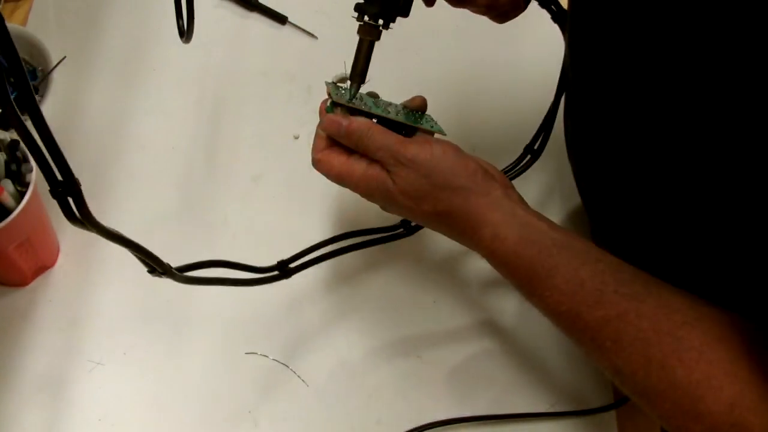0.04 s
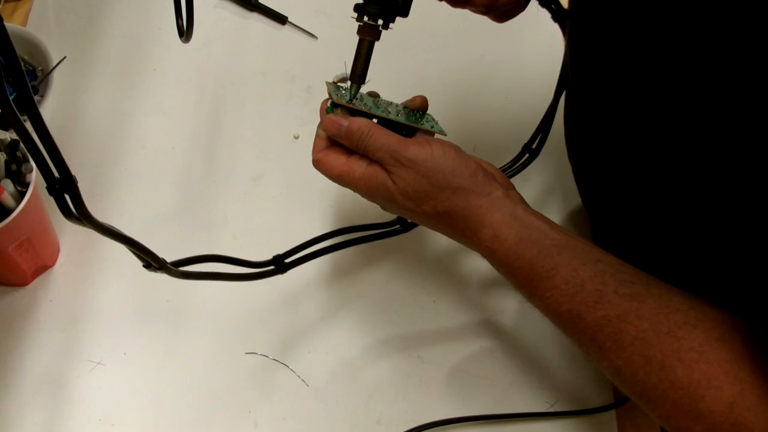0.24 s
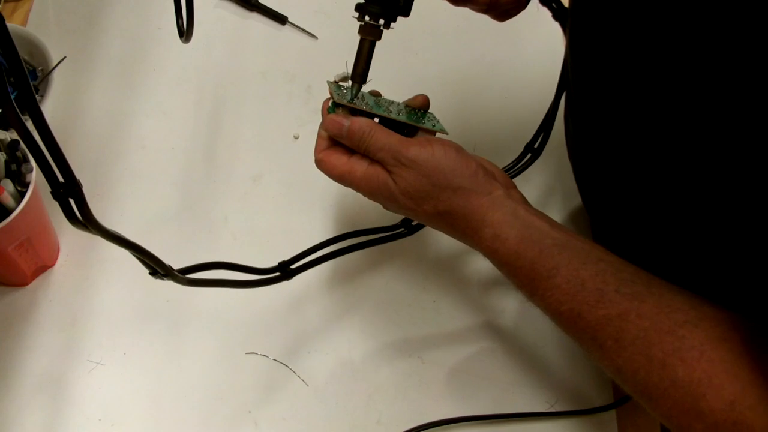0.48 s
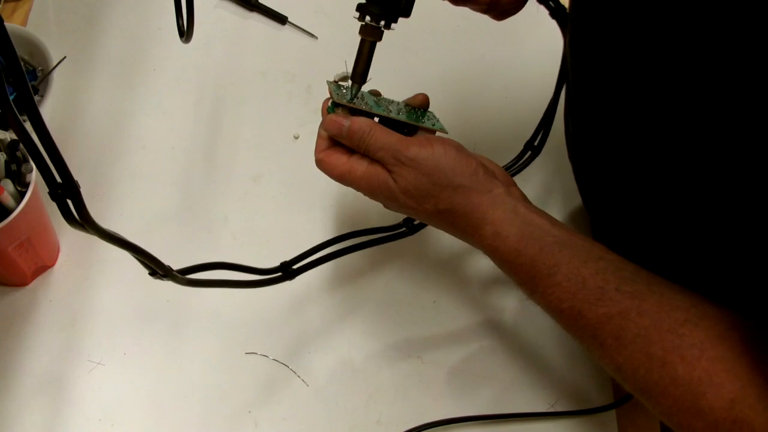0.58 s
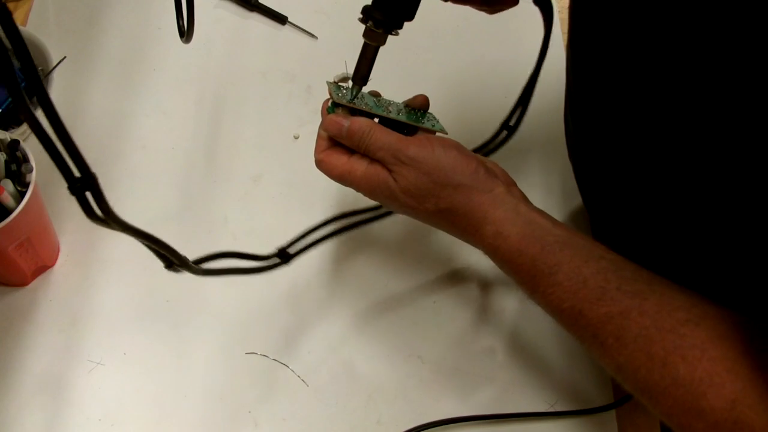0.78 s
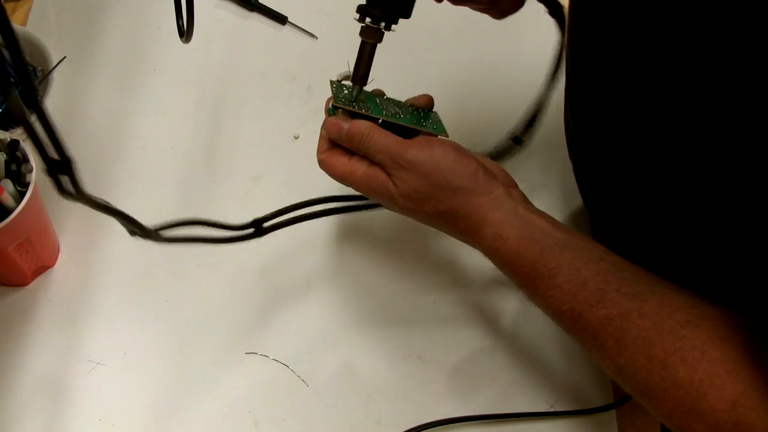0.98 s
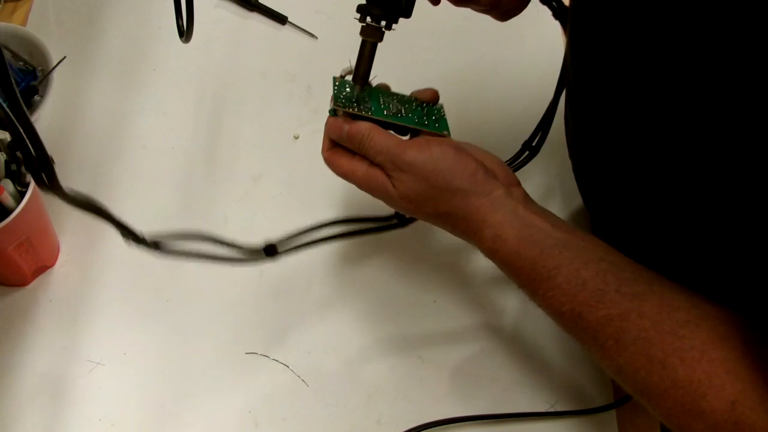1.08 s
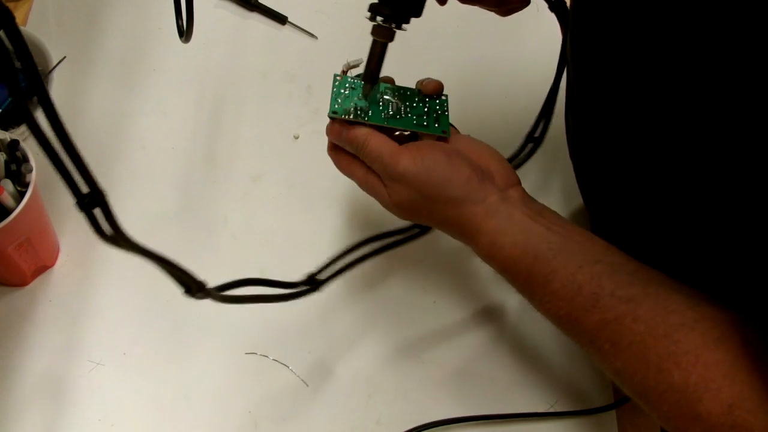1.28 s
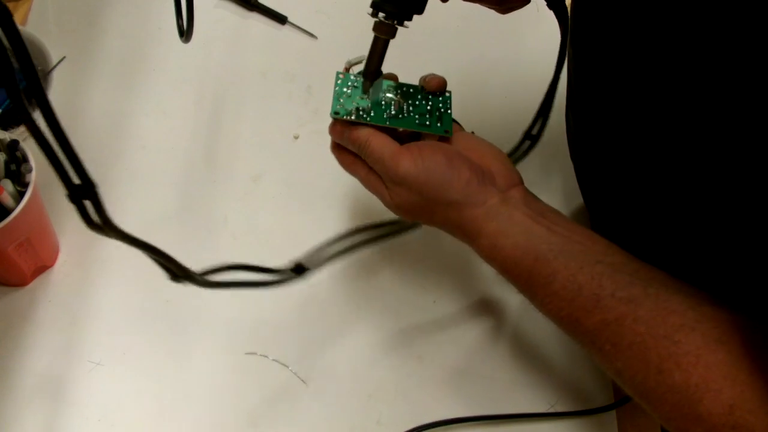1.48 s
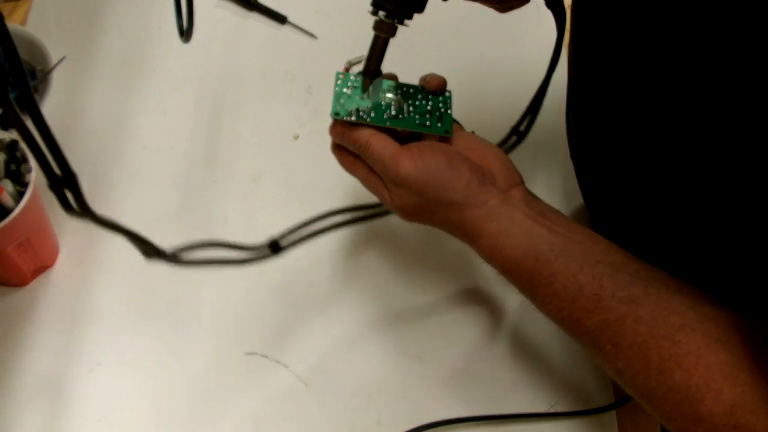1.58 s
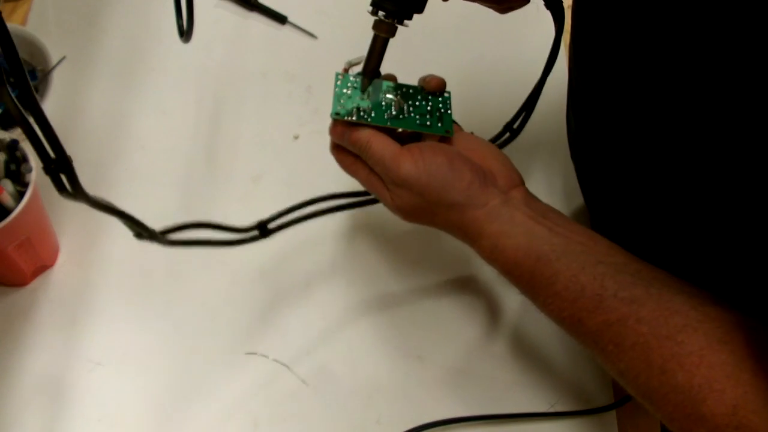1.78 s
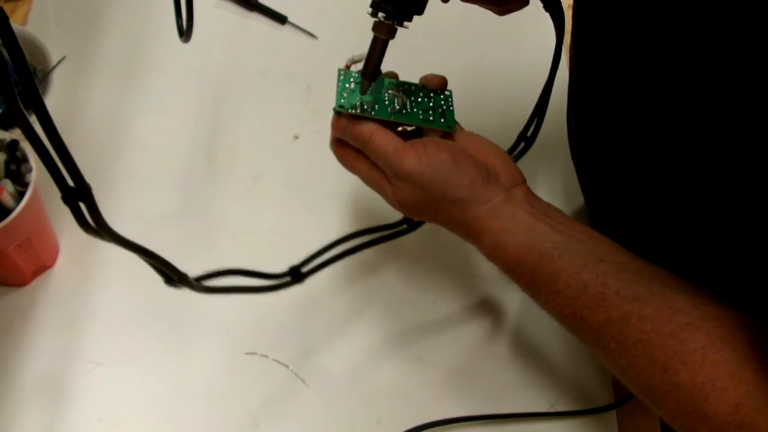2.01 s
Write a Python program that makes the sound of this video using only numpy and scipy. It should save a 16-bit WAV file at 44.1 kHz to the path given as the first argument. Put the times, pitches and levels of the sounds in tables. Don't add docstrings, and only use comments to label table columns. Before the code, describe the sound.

An electric desoldering tool in a small quiet workshop: faint taps, two trigger clicks, a low mains buzz with bright suction hiss, then a sharp release click and a hiss sliding down to silence, miked close in stereo.

```python
import sys
import numpy as np
from scipy import signal
from scipy.fft import rfft, irfft
from scipy.io import wavfile
from scipy.ndimage import uniform_filter1d

SR = 44100
rng = np.random.default_rng(int(sys.argv[2]) if len(sys.argv) > 2 else 0)


def store_wav(level_fs):
    pcm = np.round(np.clip(np.atleast_2d(level_fs), -1, 1) * 32767)
    wavfile.write(sys.argv[1], SR, pcm.T.astype(np.int16))


def how_loud(loudness_db):
    steps = np.asarray(loudness_db, float) / 20
    return 10 ** steps


N = 90404
T = np.arange(N) / SR
MAINS_HZ = 60.01

# multiple of mains, level building vacuum/dB, level once loaded/dB
PUMP_STROKES = [(1, -43, -33), (2, 1, 1.5), (2.97, -25, -21.5), (4.13, -12, -12), (5, -19, -17.5),
                (6.1, -13, -15), (7, -23.5, -22), (8, -15.5, -22.5), (9, -26, -31), (9.9, -27.5, -27.5),
                (11, -25, -21), (11.9, -17.5, -18), (13, -18.5, -16.5), (13.8, -27, -11.5), (15, -19, -34),
                (15.9, -17.5, -20), (18, -34, -25), (18.9, -18.5, -16), (20, -16.5, -17), (21, -31, -23.5),
                (22, -30, -31), (26, -16, -40), (27, -29, -9), (28, -19, -33), (29, -28, -20.5),
                (30, -14, -28), (31, -18.5, -18), (32, -23, -30), (35, -36, -18.5), (38, -22, -27.5)]
# t/s, level/dB
PUMP_DRIVE = [(.225, -55), (.244, -20.5), (.266, -3.5), (.295, -1), (.6, -0.8), (1.09, -2.1), (1.116, -5),
              (1.132, -22), (1.15, -18), (1.19, -22), (1.215, -34), (1.3, -80)]
# f/Hz, level/dB
RATTLE_SPECTRUM = [(60, -11), (200, 2.5), (500, -13), (900, 6.5), (1400, -10), (1800, 6), (2500, -4),
                   (4000, -8.5)]
# t/s, f/Hz, peak level/dB, ring/s
CASING_KNOCKS = [(.234, 163, -48.5, 0.048), (.24, 340, -54, 0.046), (.257, 1146, -47, 0.032),
                 (.29, 1165, -49.5, 0.065), (1.095, 343, -54.5, 0.11), (1.098, 1174, -64, 0.049),
                 (1.118, 852, -49, 0.022), (1.138, 884, -56.5, 0.042), (1.15, 370, -68, 0.064),
                 (1.115, 222, -52, 0.045), (1.137, 198, -64, 0.048), (1.2, 244, -62.5, 0.048)]
# t/s, hiss level/dB, tilt/(dB per octave)
AIR_FLOW = [(.225, -78, -1), (0.246, -51, -11.5), (.29, -46, -2), (.34, -43, -1.3), (.56, -42, -0.5),
            (.78, -44.5, -1.35), (1.042, -42.5, -0.3), (1.09, -40, -0.4), (1.2, -40, 1.5),
            (1.3, -40.5, 1.1), (1.41, -44, 0.8), (1.55, -47, -0.4), (1.75, -51.5, -1.5), (1.9, -55.5, -1.1),
            (2.05, -63, -1)]
# f/Hz, density level/dB
JET_SPECTRUM = [(80, -43), (350, -21.5), (1500, -16), (2600, -14.5), (3200, -12), (6000, -9.5), (9000, -5),
                (12000, -5), (15500, -6)]
# f/Hz, width/Hz, lift at full flow/dB, lift once the flow sags/dB
TUBE_MODES = [(2990, 530, 6, 5.5), (4240, 570, 4, 7), (5300, 460, 7, 10), (6990, 710, 6, 6.5),
              (8360, 400, 4, 5), (9280, 600, 9, 4.5), (10300, 520, -1, -3), (11770, 470, 6.5, 1.5),
              (12590, 860, 13.5, 5), (13620, 590, 8.5, 5.5), (15000, 670, 7.5, 0)]
# start t/s, length/s, from f/Hz, to f/Hz, level/dB
EDGE_WHISTLES = [
    (1.31, 0.17, 15000, 11350, -49.5),
    (1.47, 0.183, 10900, 9200, -55.5),
    (1.44, 0.17, 5500, 5080, -58.5),
    (1.68, 0.17, 5560, 4460, -66),
    (1.89, 0.13, 5200, 5050, -68.5),
]
# start t/s, length/s, from f/Hz, to f/Hz, level/dB
BREATHY_SIGHS = [
    (1.25, 0.24, 10200, 8400, -49),
    (1.43, 0.18, 7750, 6800, -54),
    (1.677, 0.12, 7700, 6900, -65.5),
    (1.91, 0.11, 14100, 12000, -55.5),
    (2.02, 0.045, 10300, 9700, -63),
]
# t/s, peak level/dB, snap length/s, ring width/Hz, tail level/dB
TRIGGER_CLICKS = [
    (.1427, -32.5, 0.0024, 690, -14.5),
    (.2247, -17.5, 0.0023, 820, -16.5),
    (1.0548, -11.5, 0.00026, 400, -19),
]
# f/Hz, level in each of the three clicks/dB
TRIGGER_PARTS = [(860, -46, -23, -34), (2080, -33, -17, -41), (3440, -28, -12.5, -17), (4840, -7, 0.5, -14),
                 (6340, -20, -2, -17), (7090, -2.5, 0, -5.5), (8770, 3, -4, -16), (10870, 1.5, -3, -10.5),
                 (12800, 2, 2, -10), (13970, 0, -4, 0), (16100, -30, -32, -20)]
# t/s, f/Hz, peak level/dB, ring/s
BENCH_TAPS = [
    (.022, 2390, -55, 0.0054),
    (0.0265, 2420, -54, 0.0075),
    (.029, 2060, -54.5, 0.0056),
    (0.0945, 850, -57, 0.012),
    (.102, 1000, -63, .008),
    (.044, 900, -60, 0.01),
]
# f/Hz, density level/dB
ROOM_SPECTRUM = [(25, -30), (200, -6), (400, -1), (850, 2), (1800, -3.5), (8000, -4.5), (9000, -7),
                 (14500, -6)]
# f/Hz, level/dB
ROOM_SIDE = [(100, -7), (300, -9.5), (4000, -7.0), (8000, -5.5)]
# f/Hz, side level/dB
SIDE_SPECTRUM = [(110, -59), (200, -22), (700, -16), (1300, -14), (2400, -16), (4400, -22), (6200, -10),
                 (8500, -4), (10800, 0), (12200, -8)]
# f/Hz, left minus right level/dB
LEAN_SPECTRUM = [(60, 0), (350, 0.6), (700, -1.5), (1650, -0.5), (4970, 0), (9000, 0), (15000, 1.8)]


def pump_load():
    loaded_s, loading_s = 0.49, 0.063
    return 1 / (1 + np.exp(-(T - loaded_s) / loading_s))


def pump_strokes():
    load = pump_load()
    overtones_stop_s, overtones_db_per_s = 1.108, -450
    coast_db = overtones_db_per_s * np.maximum(T - overtones_stop_s, 0)
    lines = np.zeros(N)
    for multiple, building_db, loaded_db in PUMP_STROKES:
        harmonic = round(multiple)
        overtone = harmonic != 2
        level_db = building_db + (loaded_db - building_db) * load + overtone * coast_db
        level_db = level_db + 0.7 * min(multiple / 10, 2) * wander(size=900)
        cycles = harmonic * MAINS_HZ * T + rng.random() * overtone
        lines += how_loud(level_db) * np.sin(2 * np.pi * cycles)
    return np.sqrt(2) * how_loud(-47.5) * lines


def casing_rattle():
    beat = 1 + 0.37 * np.cos(2 * np.pi * MAINS_HZ * T)
    kick_db, kick_s = 13, 0.068
    kick = how_loud(kick_db * np.exp(-((T - .28) / kick_s) ** 2))
    return how_loud(-62) * kick * evened(coloured(beat * rng.standard_normal(N), RATTLE_SPECTRUM))


def casing_hum():
    ring_db, ring_db_per_s, idle_db = -70, -24.5, -90.5
    fade_in = np.clip((T - 1.17) / 0.14, 0, 1)
    level = how_loud(ring_db + ring_db_per_s * (T - 1.21)) * fade_in + how_loud(idle_db) * (T < 1)
    return np.sqrt(2) * level * how_loud(0.5 * wander(size=2000)) * np.sin(2 * np.pi * 2 * MAINS_HZ * T)


def pump():
    drive = how_loud(np.interp(T, *np.transpose(PUMP_DRIVE), left=-120, right=-120))
    rattle_drive = uniform_filter1d(drive, size=2500) * (T > PUMP_DRIVE[1][0])
    return drive * pump_strokes() + rattle_drive * casing_rattle() + casing_hum() + taps(CASING_KNOCKS)


def nozzle():
    hop, size = 128, 512
    frames, hz = N // hop + 5, np.fft.rfftfreq(size, 1 / SR)[:, None]
    real, imag, patches = rng.standard_normal((frames, size // 2 + 1, 3)).T
    patches = uniform_filter1d(uniform_filter1d(patches, size=5, axis=0), size=22, axis=1)
    patch_db = 1.5 * evened(patches)
    flow_s, level_db, tilt = np.transpose(AIR_FLOW)
    t = np.arange(frames) * hop / SR
    sag_s, sagging_s = 1.267, 0.069
    sag = 1 / (1 + np.exp(-(t - sag_s) / sagging_s))
    lift = 0
    for mode_hz, width_hz, full_db, sagged_db in TUBE_MODES:
        mode_db = full_db + (sagged_db - full_db) * sag
        lift = lift + mode_db / (1 + (2 * (hz - mode_hz) / width_hz) ** 2)
    slope = np.interp(t, flow_s, tilt) * np.log2(np.maximum(hz, 2500) / 8000)
    gain = how_loud(read(JET_SPECTRUM, hz) + lift + slope)
    gain = gain / np.sqrt((gain ** 2).mean(0))
    spectrum = (real + 1j * imag) * gain * how_loud(patch_db)
    hiss = evened(signal.istft(spectrum, nperseg=size, noverlap=size - hop)[1][:N])
    return hiss * how_loud(np.interp(T, flow_s, level_db, left=-120) + 0.54 * wander(size=150))


def whistles(rows, width_hz):
    out = np.zeros(N)
    for s, length, from_hz, to_hz, db in rows:
        u = np.arange(0, length, 1 / SR) / length
        hz = from_hz + (to_hz - from_hz) * u
        tone = resonate_twice(rng.standard_normal(N)[:len(u)], hz, width_hz, width_hz)
        swell = np.sin(np.pi * u) ** 0.35
        waver = how_loud(1.5 * wander(size=300)[:len(u)])
        add(out, s, how_loud(db) * swell * evened(tone) * waver)
    return out


def trigger():
    out, t = np.zeros(N), np.arange(6000) / SR
    no_thump = signal.butter(6, 720, "high", fs=SR, output="sos")
    creep_s, creep_db = .003, -30
    tail_s, tail_width_hz = .03, 2400
    linger_db, linger_s = -14.5, 0.31
    tail_decay = how_loud(-60 * t / tail_s) + how_loud(linger_db - 60 * t / linger_s)
    for k, (s, peak_db, snap_s, width_hz, tail_db) in enumerate(TRIGGER_CLICKS):
        knock, noise = rng.standard_normal((2, len(t)))
        knock = np.sign(knock) * np.exp(-(t / snap_s) ** 3)
        snap, scatter = np.zeros(len(t)), np.zeros(len(t))
        for part in TRIGGER_PARTS:
            hz, level = part[0], how_loud(part[1 + k])
            snap += level * evened(resonate_twice(knock, hz, width_hz, 2 * width_hz))
            scatter += level * resonate_twice(noise, hz, tail_width_hz, tail_width_hz)
        scatter = evened(scatter)
        tail = scatter * how_loud(tail_db) * tail_decay
        click = snap / abs(snap).max() + tail
        add(out, s, how_loud(peak_db) * signal.sosfilt(no_thump, click))
        creep = np.arange(0, creep_s, 1 / SR) / creep_s
        add(out, s - creep_s, how_loud(peak_db + creep_db) * creep * scatter[-len(creep):])
    return out


def taps(rows):
    out, t = np.zeros(N), np.arange(8000) / SR
    for s, hz, db, ring_s in rows:
        swell = np.minimum(t * hz / 2, 1)
        add(out, s, how_loud(db - 60 * t / ring_s / 2) * swell * np.sin(2 * np.pi * hz * t))
    return out


def echoes(x, ring_s):
    t = np.arange(8000) / SR
    sign = rng.choice([-1., 1.], len(t))
    sparse = rng.random(len(t)) < .1
    tail = sign * sparse * how_loud(-60 * t / ring_s / 2) * (t > .0008)
    return signal.oaconvolve(x, tail / np.linalg.norm(tail))[:N]


def room_air():
    air, side = (how_loud(-69) * evened(coloured(rng.standard_normal(N), ROOM_SPECTRUM)) for _ in range(2))
    return air, how_loud(6.5) * coloured(side, ROOM_SIDE)


def evened(x):
    return x / np.sqrt(np.mean(x ** 2) + 1e-20)


def read(points, hz):
    f, value = np.transpose(points)
    return np.interp(np.log(hz + 1), np.log(f + 1), value)


def add(mix, s, sound):
    part = mix[round(s * SR):][:len(sound)]
    part += sound[:len(part)]


def coloured(x, points):
    return irfft(rfft(x) * how_loud(read(points, np.fft.rfftfreq(N, 1 / SR))), N)


def wander(size):
    return evened(uniform_filter1d(uniform_filter1d(rng.standard_normal(N), size), size))


def resonate(x, hz, width_hz):
    turn = np.exp(2j * np.pi * np.cumsum(hz * np.ones(len(x))) / SR)
    r = np.exp(-np.pi * width_hz / SR)
    return 2 * (turn * signal.lfilter([1 - r], [1, -r], x / turn)).real


def resonate_twice(x, hz, first_width_hz, second_width_hz):
    return resonate(resonate(x, hz, first_width_hz), hz, second_width_hz)


def scene():
    motor = pump()
    near = nozzle() + whistles(EDGE_WHISTLES, 340) + whistles(BREATHY_SIGHS, 1250)
    near = near + trigger() + taps(BENCH_TAPS)
    mid = motor + near + how_loud(-10) * echoes(near, ring_s=.013)
    side = coloured(echoes(motor + near, ring_s=.09), SIDE_SPECTRUM)
    lean = np.array(LEAN_SPECTRUM) * [1, .5]
    air, air_side = room_air()
    left = coloured(mid + side, lean) + air + air_side
    right = coloured(mid - side, lean * [1, -1]) + air - air_side
    return np.array([left, right])


def low_passed(x, hz):
    taper = signal.firwin(1023, hz, window=("kaiser", 9), fs=SR)
    return signal.oaconvolve(x, taper[None], "same")


def low_pass(x):
    return signal.sosfilt(signal.butter(12, 16650, fs=SR, output="sos"), x)


def record(dry):
    low, full = low_passed(dry, 15380), low_passed(dry, 16650)
    power = (dry ** 2).mean(0) + 1e-12
    sudden_db = 11
    usual = uniform_filter1d(power, size=4000) / 3
    sudden = uniform_filter1d(power, size=130) > how_loud(2 * sudden_db) * usual
    widened = np.clip(uniform_filter1d(sudden * 1., size=300) * 9, 0, 1)
    gate = uniform_filter1d(widened, size=100)
    return low_pass(low + gate * (full - low))


dry = scene()
out = record(dry)
store_wav(out)
```